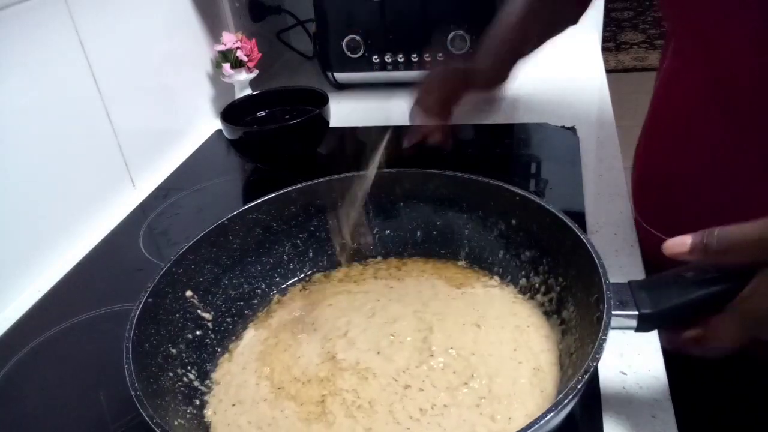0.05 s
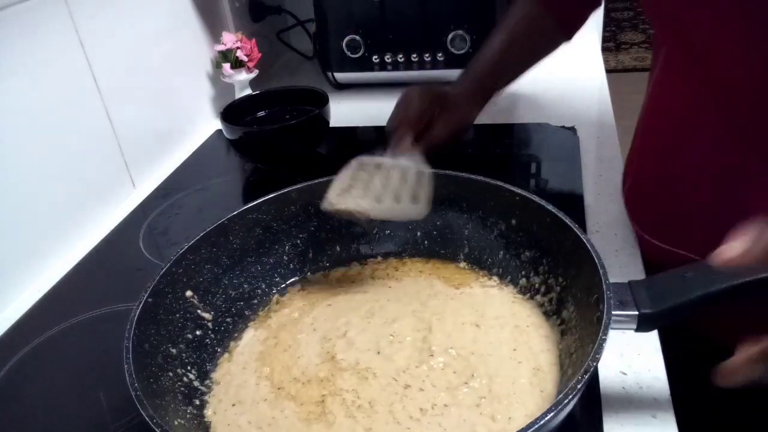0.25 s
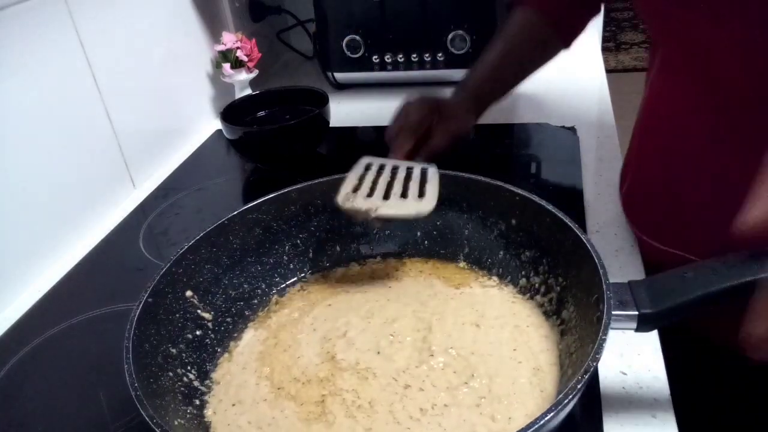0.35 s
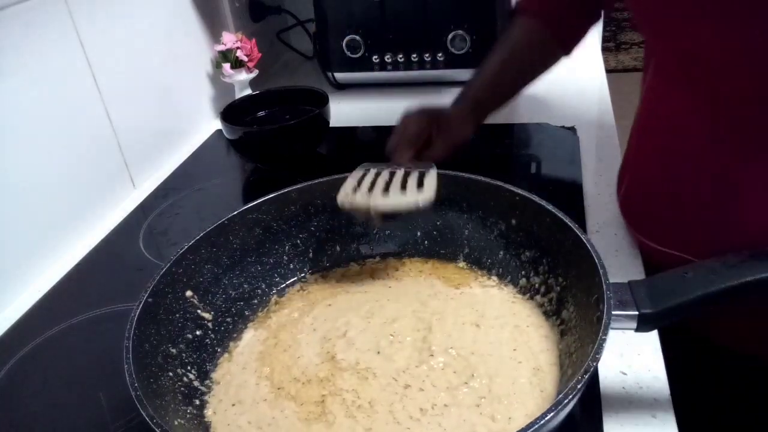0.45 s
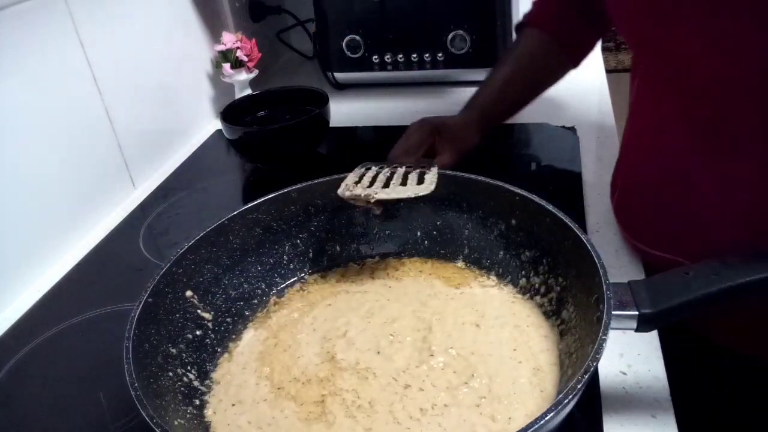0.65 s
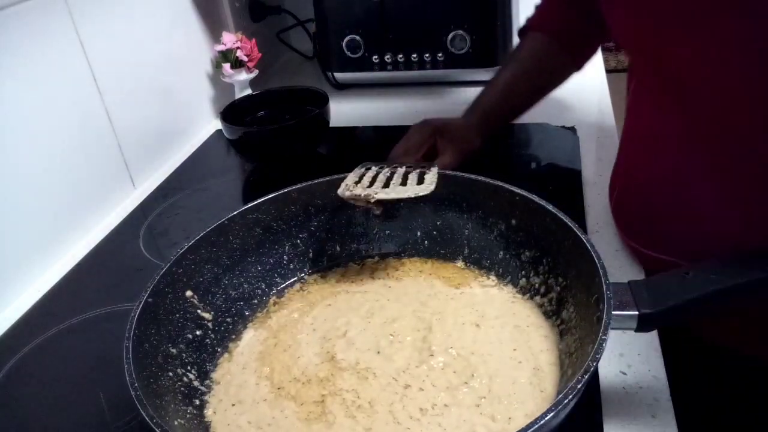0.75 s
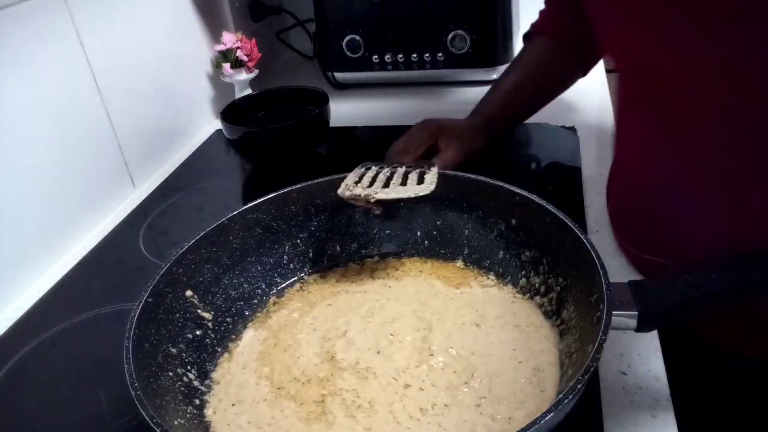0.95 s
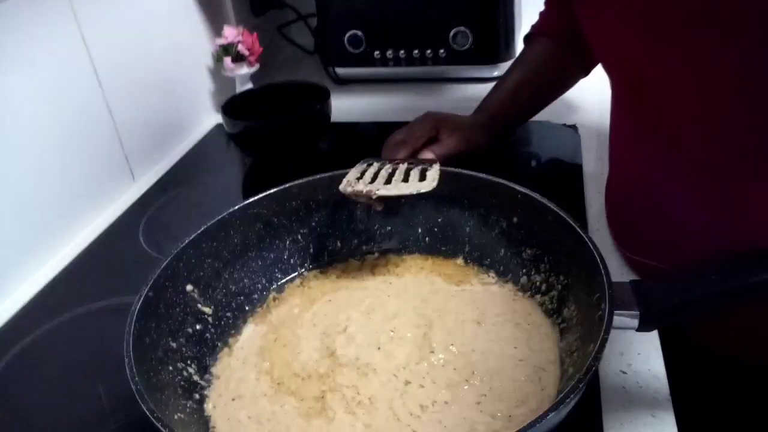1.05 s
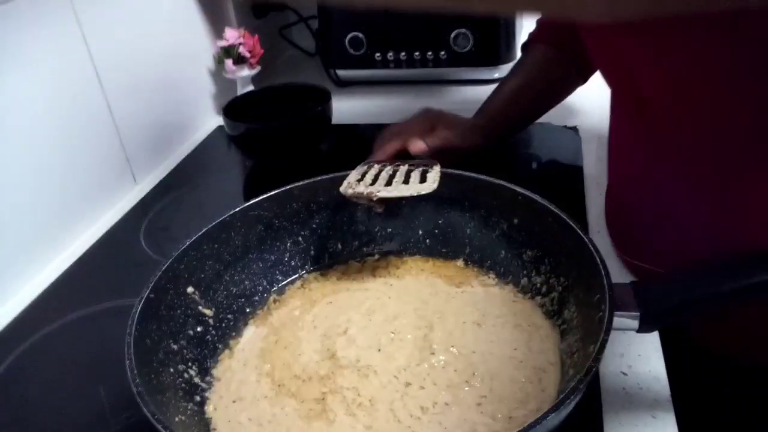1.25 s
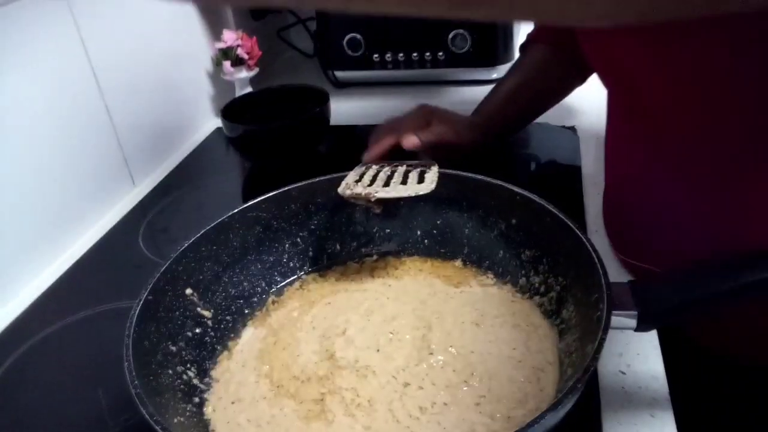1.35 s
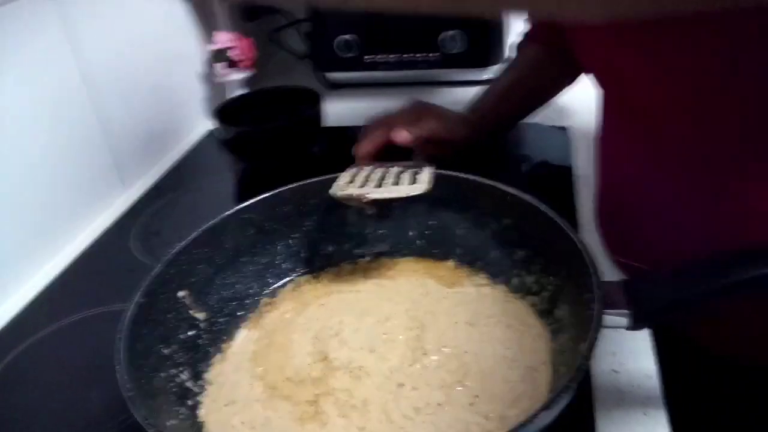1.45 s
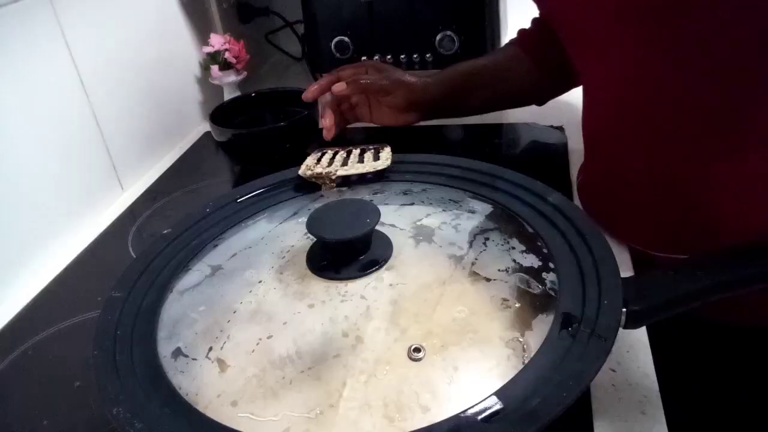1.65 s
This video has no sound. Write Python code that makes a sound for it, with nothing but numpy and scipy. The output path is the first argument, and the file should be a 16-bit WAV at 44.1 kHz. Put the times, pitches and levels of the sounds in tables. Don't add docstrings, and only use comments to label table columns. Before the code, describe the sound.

Close in a small kitchen, a pan lid lands with a bright clank and settles, and a thin metal spatula chatters to rest on it. Afterwards only low hum, faint hiss, tiny ticks and a soft knock remain.

```python
import sys
import numpy as np
from scipy import signal
from scipy.fft import rfft, irfft
from scipy.io import wavfile
from scipy.ndimage import uniform_filter1d

SR = 44100
rng = np.random.default_rng(int(sys.argv[2]) if len(sys.argv) > 2 else 0)


def boost_factor(decibels):
    exponent = np.asarray(decibels, float) / 20
    return 10 ** exponent


def wrap_up_sound(samples):
    columns = np.atleast_2d(samples).T
    tamed = np.clip(columns, -1, 1)
    steps = np.round(tamed * 32767).astype(np.int16)
    wavfile.write(sys.argv[1], SR, steps)


N = 74970
TIME_S = np.arange(N) / SR
CHANGE_S = 1.33962

# hz, level_db (per Hz)
DULL_CRACK = [(180, -27.5), (300, 1.5), (420, -1.5), (767, -0.5), (1630, -3.5), (2890, -16.5),
              (6140, -10.5), (8500, -32), (16500, -70.5)]
# hz, level_db (per Hz)
METAL_CRACK = [(180, -9.5), (300, -4), (434, -7.5), (1110, -5), (1870, -11), (6570, -2), (12400, -20.5),
               (15000, -8.5), (16500, -21.5)]


def lid():
    lid_hz = [786, 1015, 1110, 1275, 1760, 2100, 2236, 2509, 2715, 3774, 4447, 5986, 7321, 8904]
    # level_db, t60_s
    struck = [(-23, 0.095), (-7.5, 0.092), (-6, .05), (-9.5, 0.16), (-18.5, 0.19), (-4.5, 0.034),
              (-6, 0.17), (-2, 0.14), (-6, 0.066), (-19.5, 0.12), (-23.5, 0.14), (-7, 0.078), (-21, 0.072),
              (-31.5, 0.04383)]
    rock_db = [1, 1, 6, -3, -10, -9, -16, -17, -17, -25, -8, -13.5, -27, -41]
    # hz, level_db (per Hz)
    landing_crack = [(180, -41), (300, -7), (500, -9), (800, -12), (2570, -7), (4930, -18), (6030, -7.5),
                     (8160, -37.5), (15500, -48)]
    # start_s, ring_db, crack_db, boom_db, contact_s
    landing_hits = [
        (.2186, -19, -19.5, -22.5, 0.0055),
        (.2228, -34.5, -23.5, -26.5, 0.001),
        (.2290, -44.5, -22.5, -26.5, 0.0014),
    ]
    rocking_hits = [
        (.3081, -37, -31, -27.5, 0.006),
        (.3330, -44.5, -47, -29.5, 0.0079),
    ]
    # start_s, level_db, t60_s
    landing_shimmer = [(0.221, -30.5, 0.16)]
    rocking_shimmer = [(0.31, -38.5, 0.19)]
    rocking = [(db, t60) for db, (_, t60) in zip(rock_db, struck)]
    landing = clatter(landing_hits, lid_hz, struck, landing_crack, landing_shimmer)
    return landing + clatter(rocking_hits, lid_hz, rocking, DULL_CRACK, rocking_shimmer)


def spatula():
    spatula_hz = [1110, 1246, 1757, 2650, 4459, 5328, 5459, 6345, 6392, 6514, 7007, 7138, 7560, 14600]
    # level_db, t60_s
    modes = [(-17, .05), (-18, .08), (-14, .06), (-17, .08), (-6, .035), (-6, .08), (-9, .08), (-7, .09),
             (-8, .09), (0, .08), (-9, .08), (-7, .09), (-8, .05), (-11, .1)]
    # start_s, ring_db, crack_db, boom_db, contact_s
    hits = [
        (.4025, -26, -33, -41.5, 0.003),
        (.4054, -27.5, -24, -32, 0.00091),
        (.4066, -35.5, -15.5, -41.5, 0.0004),
        (.4115, -32.5, -21.5, -32, 0.0079),
        (.4210, -44, -22.5, -36, 0.0018),
        (.4300, -39.5, -31, -41, 0.0024),
        (.4375, -35, -25, -31, 0.012),
        (.4450, -48, -29, -26, 0.0012),
        (.4570, -49.5, -33, -52, 0.0087),
    ]
    # start_s, level_db, t60_s
    shimmer = [(0.403, -24.5, 0.24), (0.436, -33, 0.18)]
    return clatter(hits, spatula_hz, modes, METAL_CRACK, shimmer)


def utensil():
    utensil_hz = [1330, 2110, 2756, 3800, 4237, 4710, 5152, 5890]
    # level_db, t60_s
    modes = [(-14, .03), (-12, .08), (-6, .2), (-9, .03), (-1, .07), (-4, .06), (-5, .04), (-4, .03)]
    # start_s, ring_db, crack_db, boom_db, contact_s
    hits = [
        (1.6530, -64, -68, -80, 0.002),
        (1.6580, -66, -70, -87, 0.004),
        (1.6680, -65, -70, -87, 0.004),
    ]
    # start_s, level_db, t60_s
    shimmer = [(1.653, -67.5, 0.22)]
    return clatter(hits, utensil_hz, modes, METAL_CRACK, shimmer)


def cup():
    # pitch_hz, level_db, t60_s
    modes = [(968, -8, .2), (1001, -5, .22), (1105, 3, .035), (1480, -2, .045), (2140, 0, .04),
             (6410, -7, .035)]
    # start_s, ring_db, crack_db, boom_db, contact_s
    hits = [
        (.0090, -55.5, -51, -91.5, 0.0029),
        (.0150, -64.5, -55, -87.5, 0.002),
        (.0240, -63.5, -66.5, -93.5, 0.0014),
    ]
    # start_s, level_db, t60_s
    shimmer = [(.0100, -58.5, 0.17)]
    return clatter(hits, [m[0] for m in modes], [m[1:] for m in modes], DULL_CRACK, shimmer)


def clatter(hits, mode_hz, modes, crack, shimmer):
    hob_hz = [66, 108, 165, 215, 282, 345, 525, 790]
    # level_db, t60_s
    hob_modes = [(-6, .2), (0, .36), (-5, .16), (-7, .16), (-11, .12), (-6, .2), (-7, .25), (-17, .2)]
    hob_push_s = .002
    push, noise, boom = 0, 0, 0
    for start_s, ring_db, crack_db, boom_db, contact_s in hits:
        force = burst(start_s, contact_s / 4)
        push = push + boost_factor(ring_db) * force / force.sum()
        noise = noise + boost_factor(crack_db) * rng.standard_normal(N) * burst(start_s, contact_s)
        soft = np.exp(-((TIME_S - start_s - hob_push_s) / hob_push_s * 2) ** 2)
        boom = boom + boost_factor(boom_db) * soft / soft.sum()
    for start_s, level_db, t60_s in shimmer:
        noise = noise + boost_factor(level_db) * patchy() * burst(start_s, t60_s / np.log(1000))
    hob = ring(boom, [(hz, *mode) for hz, mode in zip(hob_hz, hob_modes)])
    return chime(push, mode_hz, modes) + colour(noise, crack) + hob


def chime(push, mode_hz, modes):
    wobble_db, wobble_rate_hz, wobble_turns, wobble_at_hz = 3, 60, .12, 3000
    out = 0
    for hz, (level_db, t60_s) in zip(mode_hz, modes):
        decay = np.exp(-np.log(1000) / (abs(t60_s) * SR))
        envelope = signal.lfilter([1], [1, -decay], push)
        level = boost_factor(level_db + wobble_db * walk(wobble_rate_hz))
        wobble = wobble_turns * np.sqrt(hz / wobble_at_hz) * walk(wobble_rate_hz)
        turns = hz * TIME_S + rng.random() + wobble
        out = out + level * envelope * np.sin(2 * np.pi * turns)
    return out


def ring(push, modes):
    out = 0
    for hz, level_db, t60_s in modes:
        pole = np.exp(2j * np.pi * hz / SR - np.log(1000) / (abs(t60_s) * SR))
        out = out + boost_factor(level_db) * signal.lfilter([1], [1, -pole], push).imag
    return out


def patchy():
    spectrum = rfft(rng.standard_normal(N))
    unevenness = boost_factor(4 * walk(700)[:len(spectrum)])
    x = irfft(spectrum * unevenness, N)
    return x / x.std()


def colour(x, table):
    table_hz, level_db = np.array(table, float).T
    hz = np.maximum(np.arange(2049) * SR / 4096, 1)
    shape_db = np.interp(np.log(hz), np.log(table_hz), level_db, left=level_db[0] - 20.5, right=level_db[-1] - 25.0)
    cepstrum = irfft(shape_db * np.log(10) / 20)
    cepstrum[1:2048] *= 2
    cepstrum[2049:] = 0
    impulse = irfft(np.exp(rfft(cepstrum)))
    return signal.fftconvolve(x, impulse / np.sqrt(np.sum(impulse ** 2)))[:N]


def burst(start_s, fade_s):
    t = TIME_S - start_s
    return (t >= 0) * np.exp(-np.abs(t) / abs(fade_s))


def swell(start_s, length_s):
    phase = np.clip((TIME_S - start_s) / length_s, 0, 1)
    return np.sqrt(np.abs(np.sin(np.pi * phase)))


def band(hz, width_hz):
    x = rng.standard_normal(N)
    for _ in range(2):
        x = ring(x, [(hz, 0, 1.5 / width_hz)])
    return x / x.std()


def walk(rate_hz):
    k = int(SR / rate_hz)
    drift = uniform_filter1d(uniform_filter1d(rng.standard_normal(N), k), k)
    return (drift - drift.mean()) / drift.std()


def faint_ticks():
    # start_s, level_db, centre_hz, width_hz, length_s
    ticks = [(0.838, -68, 6300, 1500, 0.008), (0.842, -73.5, 10700, 1564, 0.011),
             (0.954, -70.5, 2490, 2480, 0.0084), (1.051, -70, 14800, 1500, .003),
             (1.060, -71, 14600, 2000, 0.0027), (1.049, -71, 5000, 3000, 0.005),
             (1.290, -62, 7200, 900, 0.007), (1.292, -67, 6000, 2000, 0.003),
             (1.564, -75, 3065, 120, 0.026), (1.561, -68.5, 1300, 150, 0.015),
             (1.555, -71, 2300, 2500, 0.004), (1.652, -63, 1330, 200, .007), (1.652, -68, 3800, 500, .004)]
    return sum(boost_factor(db) * band(hz, width_hz) * burst(start_s, length_s)
               for start_s, db, hz, width_hz, length_s in ticks)


def hand_knocks():
    # start_s, level_db, pitch_hz, length_s
    knocks = [
        (1.5590, -36.5, 187, 0.013),
        (1.5580, -54, 580, 0.018),
        (1.575, -52, 460, 0.0056),
    ]
    out = 0
    for start_s, level_db, hz, length_s in knocks:
        t = TIME_S - start_s
        envelope = swell(start_s, length_s) * (t < length_s)
        out = out - boost_factor(level_db) * envelope * np.sin(2 * np.pi * hz * t)
    return out


def room(x):
    # pitch_hz, width_hz, level_db, t60_s
    pots = [(509, 97, -17.5, .38), (796, 90, -15, .45), (2228, 120, -14, .45), (2663, 160, -15, 0.49),
            (3275, 130, -11.5, .5), (5195, 90, -13, 0.68), (6520, 120, -18, 0.35), (7460, 80, -17.5, 0.52)]
    clears_s, clearing_s = .27, .03
    t, tail = np.arange(SR // 2) / SR, 0
    for low_hz, high_hz, t60_s in ((60, 2000, 0.53), (2001, 7600, 0.48), (7700, 7900, 0.079)):
        band_pass = signal.butter(2, (low_hz, high_hz), "band", fs=SR, output="sos")
        part = signal.sosfilt(band_pass, rng.standard_normal(len(t)))
        tail = tail + part * np.exp(-np.log(1000) * t / t60_s)
    for hz, width_hz, level_db, t60_s in pots:
        tail = tail + boost_factor(level_db) * band(hz, width_hz)[-len(t):] * np.exp(-np.log(1000) * t / t60_s)
    onset = np.minimum(t / 0.0025, 1)
    tail = tail * onset / (1 + np.exp((t - clears_s) / clearing_s))
    return signal.fftconvolve(x, tail / np.sqrt(np.sum(tail ** 2)))[:N]


def hum():
    # multiple (of mains_hz), peak_db
    mains = [(.5, -72), (1, -40), (2, -70.5)]
    # order (of fan_hz), peak_db
    fan = [(3, -50.5), (4, -62.5)]
    # mains_hz, mains_crest_s, fan_hz (shaft), blade_crest_s
    moments = [
        (100.06, .1118, 38.48, .11131),
        (100.11, 1.44605, 39.10, 1.45131),
    ]
    lines = mains + fan
    drift_db = [0.36 * walk(4) for _ in lines]
    versions = []
    for mains_hz, mains_crest_s, fan_hz, blade_crest_s in moments:
        turns = [k * mains_hz * (TIME_S - mains_crest_s) for k, _ in mains]
        turns += [k * fan_hz * (TIME_S - blade_crest_s) for k, _ in fan]
        versions.append(sum(boost_factor(db + drift) * np.cos(2 * np.pi * turn)
                            for (_, db), drift, turn in zip(lines, drift_db, turns)))
    fade = np.clip((TIME_S - CHANGE_S) * SR / 3 + .5, 0, 1)
    return versions[0] * (1 - fade) + versions[1] * fade


def fan_air():
    # hz, level_db (per Hz)
    rumble_colour = [(30, -11.5), (70, -17), (130, 4.5), (170, 2.5), (240, -16), (570, -29.5), (800, -30.5),
                     (3000, -36.5)]
    # hz, level_db (per Hz)
    hiss_colour = [(2500, -12), (4000, -5), (5500, -1.5), (6500, 3.5), (7500, -7), (9000, -15),
                   (13000, -15.5), (15700, -11.5)]
    buzz_hz, buzz_db = 57.7, 6.5
    later_db = 3.5 * (TIME_S >= CHANGE_S)
    pulse_db = buzz_db * np.exp(-(TIME_S * buzz_hz % 1) / 0.11)
    rumble = boost_factor(-62 + later_db) * colour(rng.standard_normal(N), rumble_colour)
    hiss_level = boost_factor(-79.5 + later_db + pulse_db + 1.1 * walk(6.7))
    hiss = hiss_level * colour(rng.standard_normal(N), hiss_colour)
    duct = boost_factor(-83 + 1.0 * walk(4.7)) * band(575, 40)
    return rumble + hiss + duct


def coil_whine():
    # start_s, length_s, pitch_hz, width_hz, level_db
    whines = [(.07, .11, 5130, 25, -83), (.11, .11, 6040, 35, -77), (.70, .07, 6070, 70, -79),
              (.70, .14, 5170, 50, -85), (.82, .18, 6030, 80, -79), (1.02, .14, 6060, 70, -80),
              (.97, .17, 5170, 50, -81), (1.10, .19, 5115, 30, -77), (1.16, .1, 6040, 80, -85),
              (1.27, .07, 6060, 60, -77), (1.33, .09, 5800, 70, -80), (1.34, .2, 6900, 90, -82),
              (.82, .17, 5830, 110, -83), (1.02, .24, 5800, 100, -83), (.88, .1, 5100, 60, -86)]
    return sum(boost_factor(db + 2) * swell(start_s, length_s) * band(hz, width_hz)
               for start_s, length_s, hz, width_hz, db in whines)


def scene():
    hits = lid() + spatula() + utensil() + cup() + faint_ticks() + hand_knocks()
    low_cut = signal.butter(6, 69, "high", fs=SR, output="sos")
    hits = signal.sosfilt(low_cut, hits)
    return (hits + boost_factor(-15.5) * room(hits) + hum() + fan_air() + coil_whine())[None]


def band_limit(x):
    return signal.sosfilt(signal.butter(12, 16690, fs=SR, output="sos"), x)


def record(dry):
    top_cut = signal.ellip(8, .2, 50, 15650, fs=SR, output="sos")
    cut = signal.sosfiltfilt(top_cut, dry)
    mix = cut + boost_factor(-25.5) * (dry - cut)
    return band_limit(mix)


dry = scene()
out = record(dry)
wrap_up_sound(out)
```